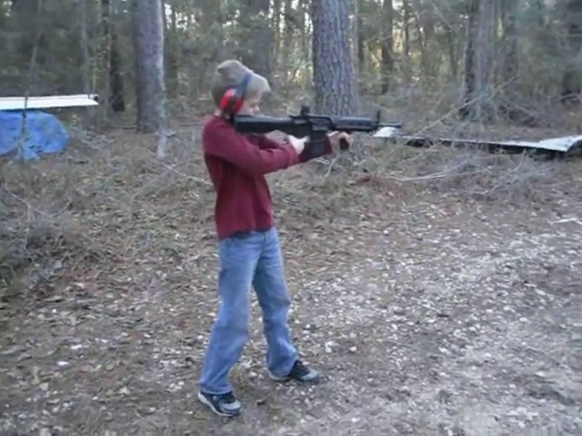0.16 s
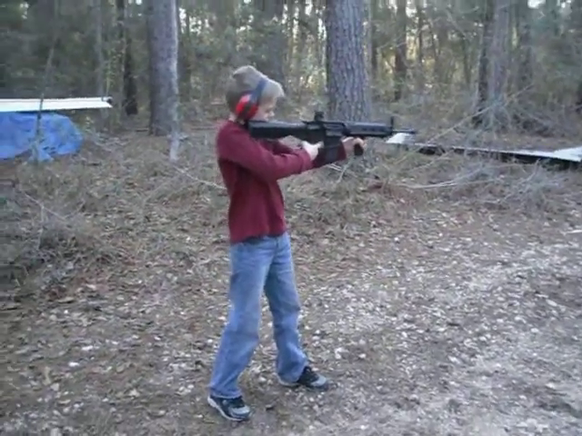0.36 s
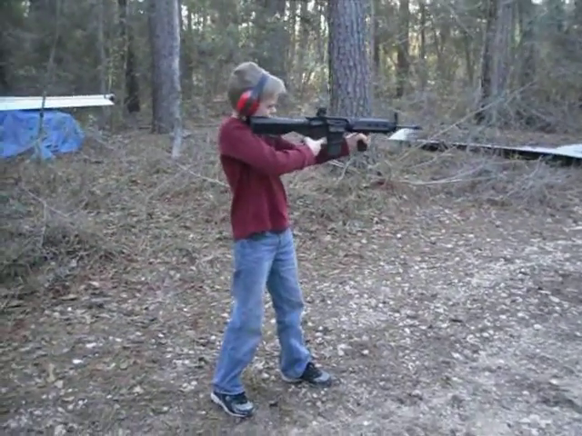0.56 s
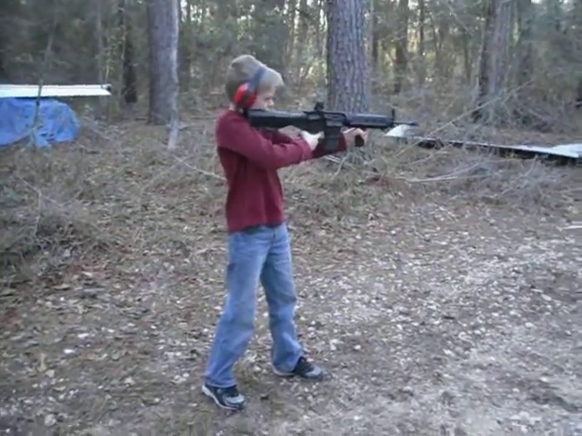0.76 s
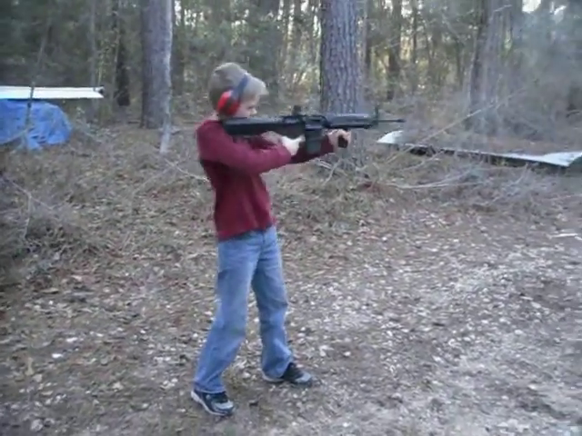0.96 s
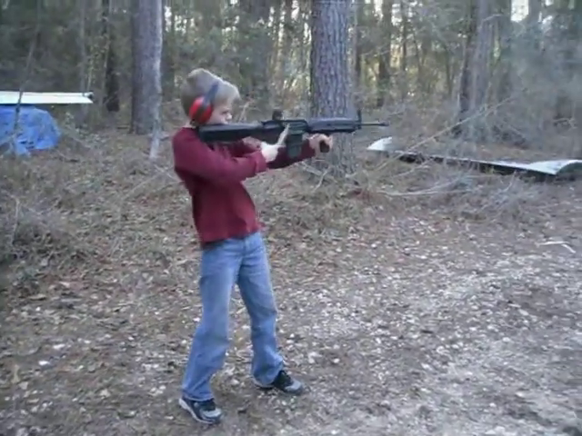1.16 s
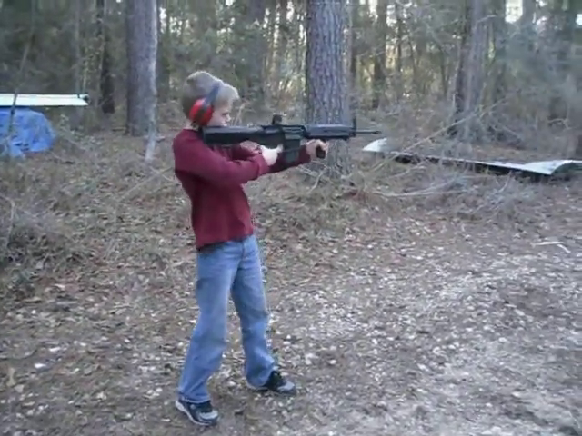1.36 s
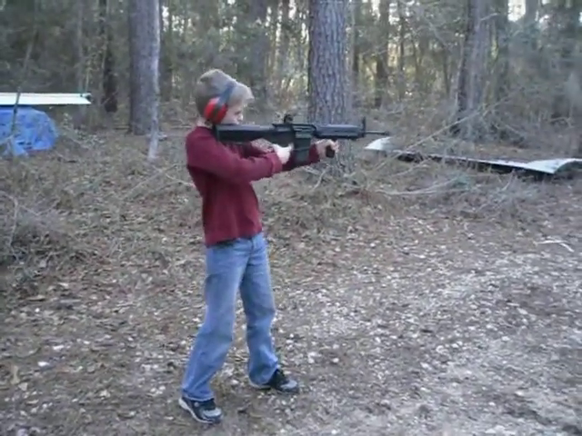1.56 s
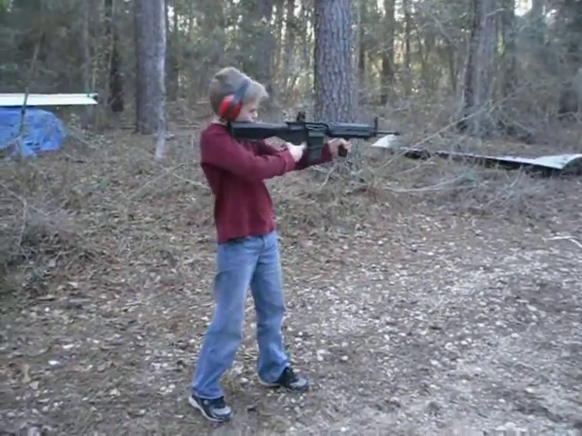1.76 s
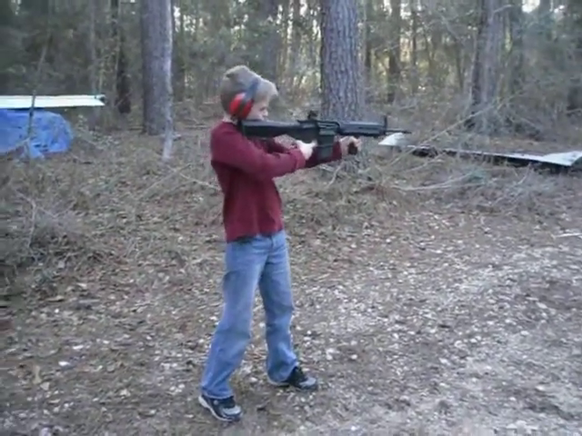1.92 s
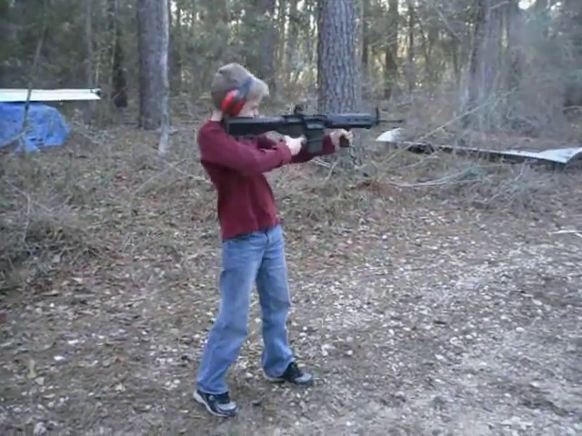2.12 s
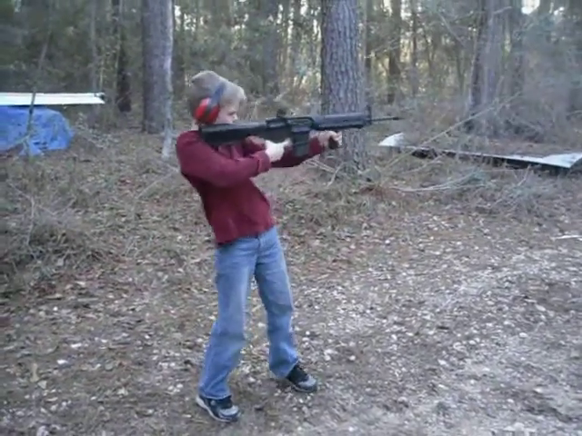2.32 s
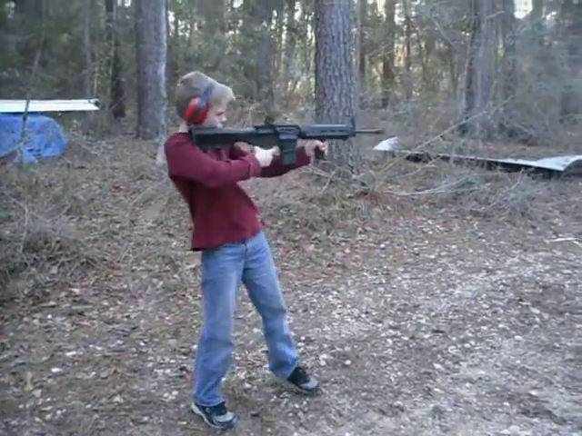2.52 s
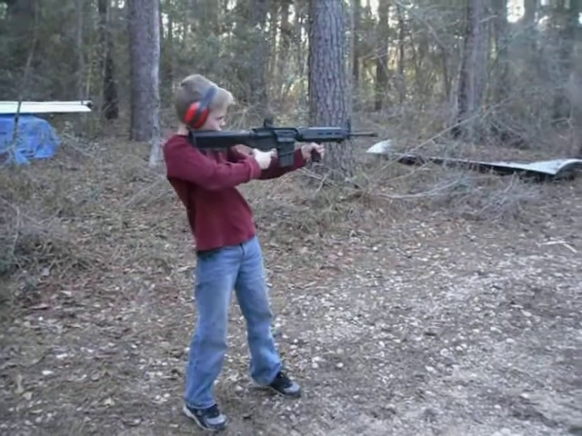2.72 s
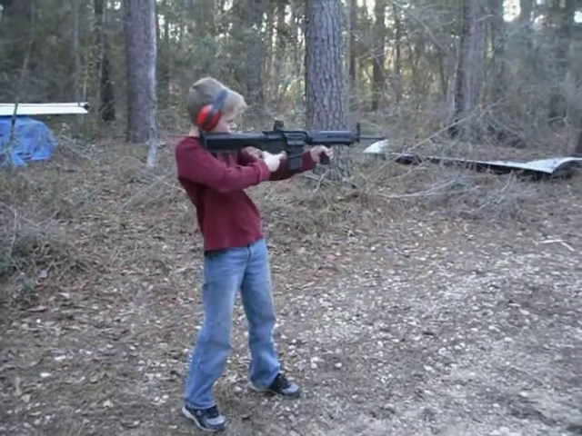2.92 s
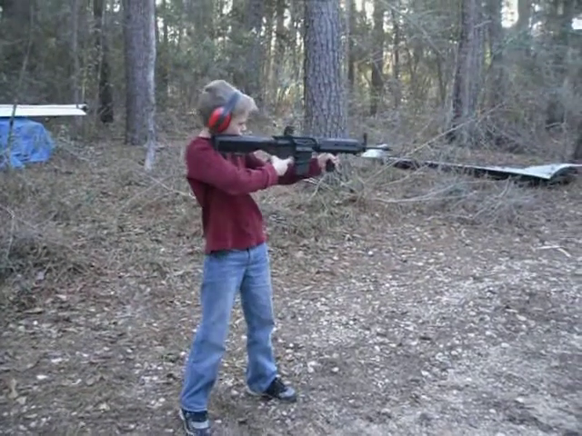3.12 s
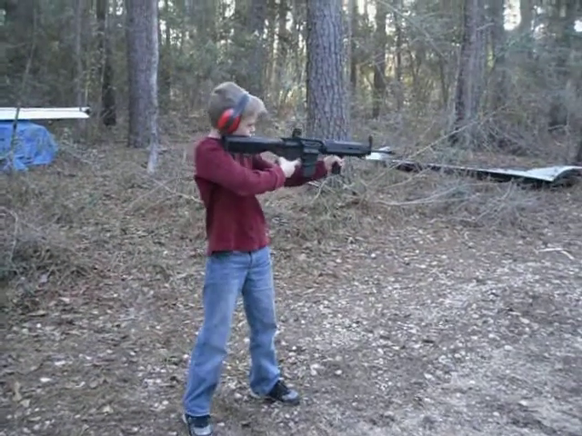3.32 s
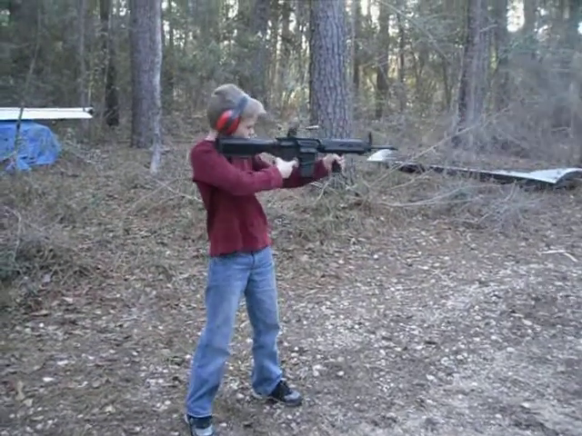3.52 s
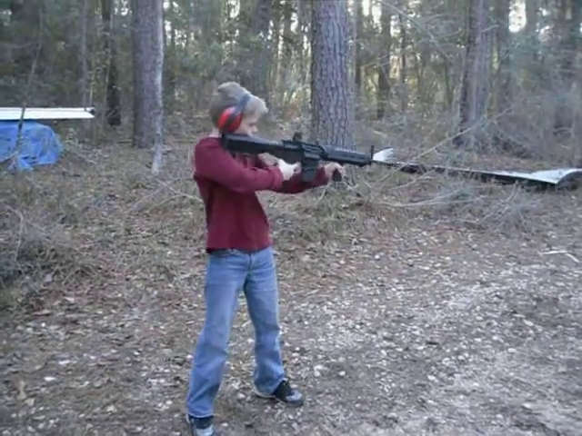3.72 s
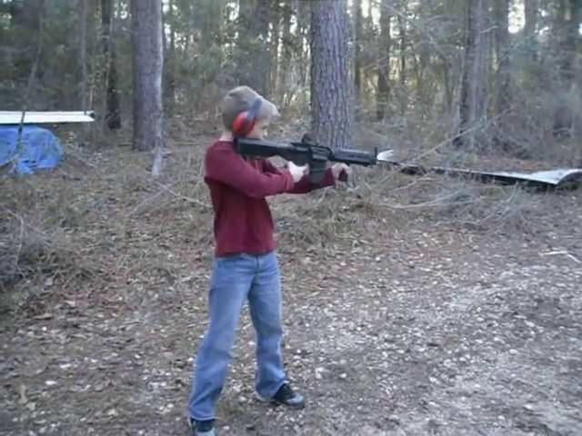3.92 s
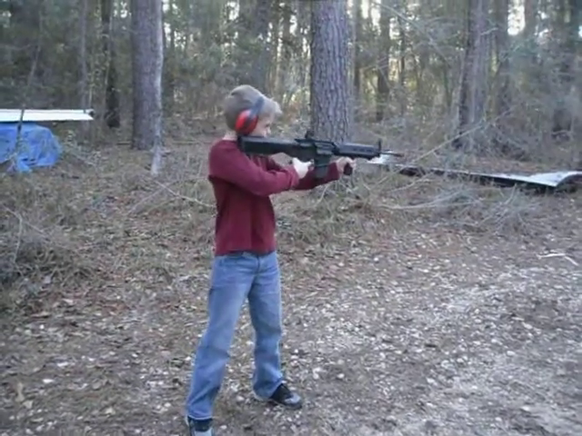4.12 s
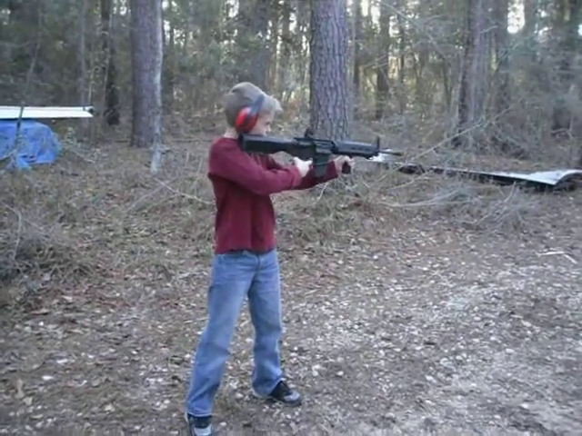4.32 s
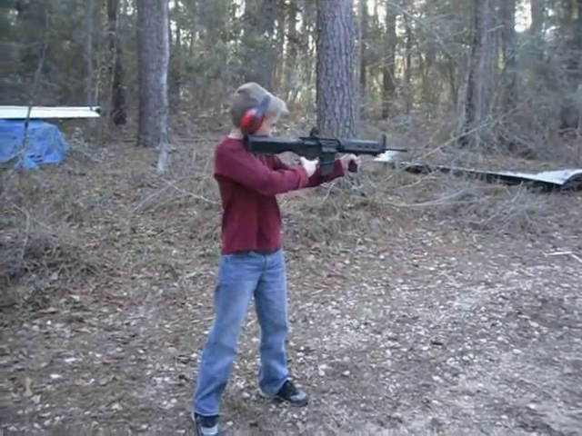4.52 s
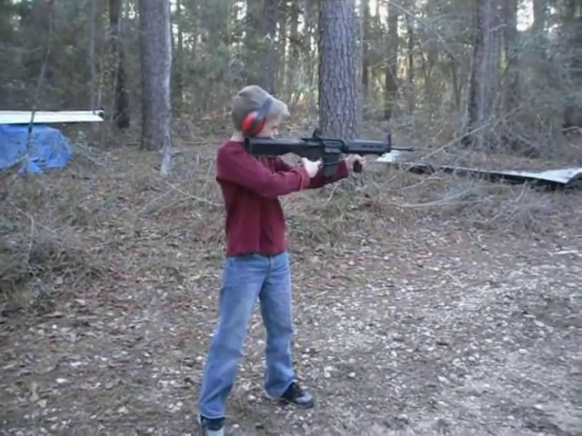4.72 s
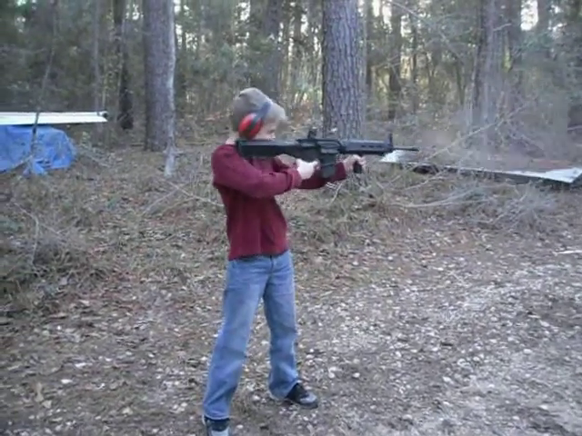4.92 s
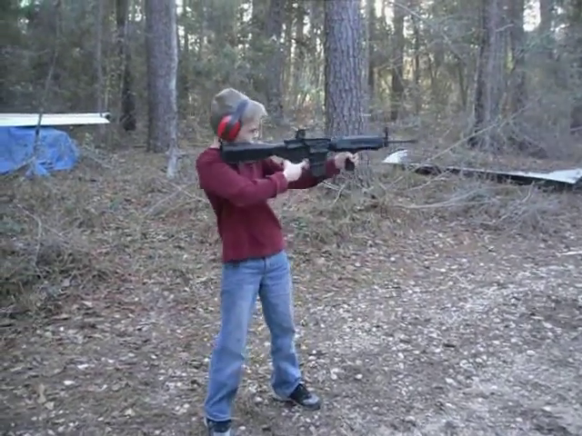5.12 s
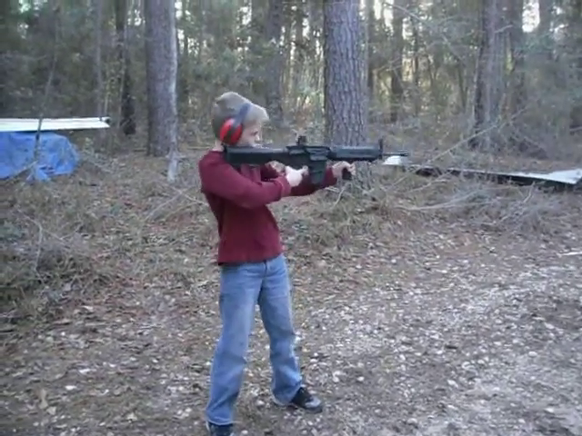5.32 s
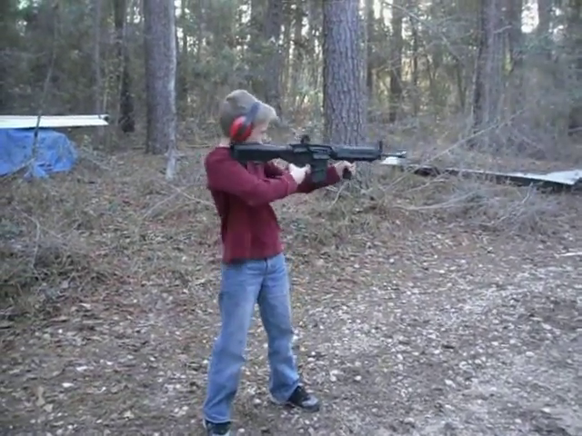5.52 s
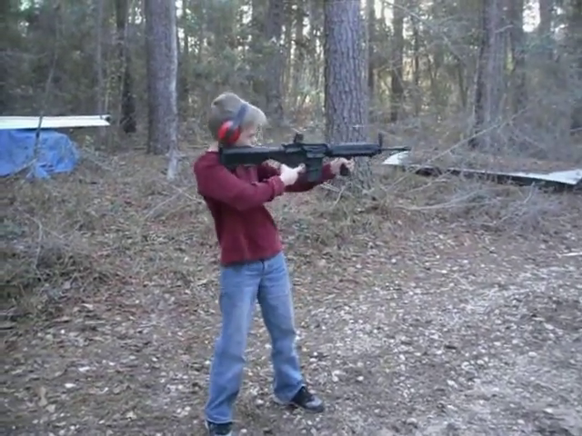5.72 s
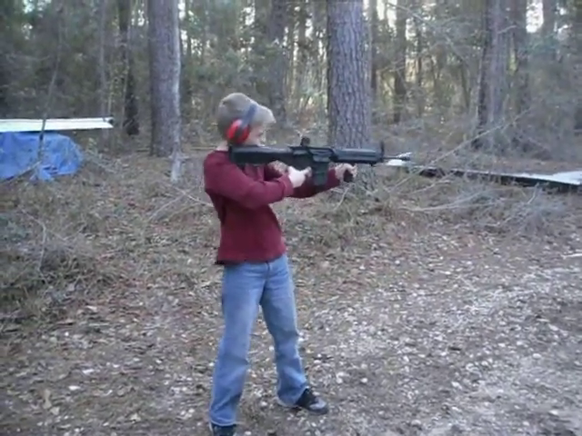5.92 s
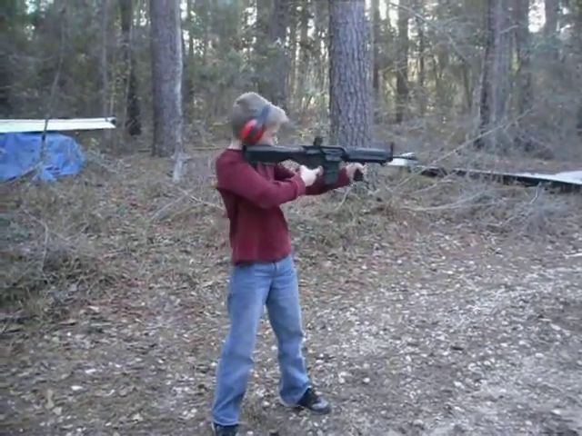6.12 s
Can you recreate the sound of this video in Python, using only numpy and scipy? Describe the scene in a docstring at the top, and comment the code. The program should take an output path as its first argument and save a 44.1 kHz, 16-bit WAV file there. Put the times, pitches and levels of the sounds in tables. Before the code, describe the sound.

A rifle fires five quick bursts in a forest clearing, a few metres from the microphone. Two shots come at 0.8 seconds, three at 2.0, then pairs at 3.4, 4.8 and 5.5, the rounds within each burst less than a tenth of a second apart. Each is a sharp crack with a low thump and a bolt clack buried in it, overloading the microphone into a gritty roar. The blasts slap off nearby trunks and roll through the woods for two to three seconds, filling the gaps. At about 2.3 seconds a bright metallic double ping rings down range. Spent brass cases land in dry leaves with small ticks and clinks, clearest at 1.4, 4.2 and 6.2 seconds, with a slight leaf rustle around 4.5. A very faint outdoor hush lies underneath, and the last echo is still fading at the end.

```python
"""In a pine clearing, a rifle fires five quick bursts of two or three rounds a few metres from a camera.
Each blast scatters off the ground and trunks, then reverberates through the woods; the bolt clacks,
something pings down range and spent brass cases land in dry leaves over a faint hush.
The blasts overdrive the camera's microphone, and clipping turns them into a square-topped roar."""
import sys
import numpy as np
from scipy import signal
from scipy.fft import rfft, irfft, next_fast_len
from scipy.io import wavfile
from scipy.ndimage import uniform_filter1d

SR = 44100
rng = np.random.default_rng(int(sys.argv[2]) if len(sys.argv) > 2 else 0)


def store_wav(level_fs):
    """Save 16-bit WAV to argv[1]."""
    pcm = np.round(np.clip(np.atleast_2d(level_fs), -1, 1) * 32767)
    wavfile.write(sys.argv[1], SR, pcm.T.astype(np.int16))


N = 276507

# bursts of fire: start t/s, rounds, cycle of the action t/s, relative level/dB, step per round/dB
BURST_TIMES = [(0.7893, 2, 0.092, -1, 0), (1.9669, 3, 0.089, -1.5, 1.32), (3.3503, 2, 0.089, 0.5, -2.5),
               (4.7931, 2, .0891, 0.9, -2.5), (5.473, 2, 0.085, 0, -1)]


def amp(db):
    """Amplitude ratio of a level in decibels."""
    return 10 ** (np.asarray(db) / 20)


def unit(x):
    """Normalisation to rms 1."""
    return x / np.sqrt(np.mean(x ** 2) + 1e-20)


def along(table, hz, column=1):
    """Interpolation of a table column on a logarithmic frequency axis."""
    columns = np.transpose(table)
    return np.interp(np.log(hz + 1), np.log(columns[0]), columns[column])


def filtered(x, response):
    """Linear filtering: the spectrum is multiplied by a frequency response."""
    n = x.shape[-1]
    padded = next_fast_len(n + 4096, real=True)
    return irfft(rfft(x, padded) * response(np.fft.rfftfreq(padded, 1 / SR)), padded)[..., :n]


def coloured(x, spectrum, peaks=()):
    """Spectral shaping by an envelope and Gaussian peaks; the result has rms 1, so levels are relative."""
    bumps = lambda f: sum(db * np.exp(-.5 * ((f - hz) / width) ** 2) for hz, width, db in peaks)
    return unit(filtered(x, lambda f: amp(along(spectrum, f) + bumps(f))))


def noise_band(size, hz, width_hz):
    """Resonance: noise under a Lorentzian peak, at rms 1."""
    return unit(filtered(rng.standard_normal(size), lambda f: 1 / (1 + ((f - hz) / width_hz) ** 2)))


def add(track, s, sound):
    """Superposition of a sound on the track from time s."""
    part = track[round(s * SR):][:len(sound)]
    part += sound[:len(part)]


def shots():
    """Periodic cycling of the action spaces the rounds of a burst: t/s, level/dB of each."""
    return [(start + k * cycle, db + k * step_db)
            for start, count, cycle, db, step_db in BURST_TIMES for k in range(round(count))]


def scatter(size, correlation=.7):
    """Scattering by fixed trees is correlated: one mostly alike noise row per round, and a time axis."""
    noise = rng.standard_normal((len(shots()) + 1, size))
    return np.sqrt(correlation) * noise[0] + np.sqrt(1 - correlation) * noise[1:], np.arange(size) / SR


def reverberation(table, rise_s, size, peaks=()):
    """Diffuse reflections build up, then decay exponentially at each frequency's own rate."""
    noise, t = scatter(size)
    hz, age, bands = signal.stft(coloured(noise, table, peaks).astype(np.float32), SR, nperseg=512)
    decay = amp(-60 * age / along(table, hz, column=2)[:, None]).astype(np.float32)
    tail = signal.istft(bands * decay, SR, nperseg=512)[1][:, :size]
    return tail * (1 - np.exp(-t / rise_s))


def air():
    """Stationary noise: a faint hush with a narrow band in it, heard as a thin distant drone."""
    # quiet woods and microphone hiss: f/Hz, level/dB
    hush_spectrum = [(18, -37), (30, -11), (76, -1), (104, -8), (458, -8), (648, -7.5), (711, -2.5),
                     (779, -8), (1180, -12.5), (3840, -17), (4110, -17), (5950, -18), (7500, -13.5),
                     (9750, -56), (16500, -120)]
    # the drone: f/Hz, width/Hz, gain/dB
    drone_peak = [(735, 11, 5)]
    return amp(-63) * coloured(rng.standard_normal(N), hush_spectrum, peaks=drone_peak)


def leaf_litter(crinkle_db=4, sift_db=-74):
    """Amplitude-modulated noise: dry leaves crinkle in swells, and sift faintly from the first shot on."""
    # stirrings of the litter: t/s, level/dB, swell t/s
    stirrings = [(4.32, -63, .015), (4.521, -64, .025), (4.58, -69.5, .015)]
    # rustle of dry leaves: f/Hz, level/dB
    leaf_spectrum = [(2500, -11.5), (4500, -6), (6500, 10), (7500, -8.5)]
    track, t = np.zeros(N), np.arange(SR // 4) / SR
    for s, db, swell in stirrings:
        noise = rng.standard_normal(len(t))
        crinkle = amp(crinkle_db * unit(uniform_filter1d(rng.standard_normal(len(t)), size=100)))
        envelope = amp(db) * t / swell * np.exp(1 - t / swell)
        add(track, s, envelope * coloured(noise * crinkle, leaf_spectrum))
    add(track, BURST_TIMES[0][0], amp(sift_db) * coloured(rng.standard_normal(N), leaf_spectrum))
    return track


def spent_cases(tick_t60=.031, rustle_db=-20, rustle_t60=.18):
    """Impact excites a case's modes, more so in a hard landing; each end ticks and stirs the leaves."""
    # cases landing: t/s, level/dB, tick f/Hz
    landings = [(1.4356, -39, 6100), (1.8781, -55, 6470), (2.846, -54, 6200), (3.013, -50, 6400),
                (4.152, -47.5, 5166), (4.2335, -32, 4380), (4.3218, -50, 6210), (4.5314, -55, 4800),
                (6.1624, -39, 6800), (6.2302, -48, 5810), (6.2507, -47, 6190), (6.2644, -42, 5890)]
    # modes of a brass case: f/Hz, level/dB, T60/s
    brass_modes = [(3025, 0, .067), (3402, -7, .063), (3760, 2, 0.05), (5087, -14, .072), (7200, -2, .032)]
    slap_s, slap_db = .0052, -8.5  # the second end comes down
    ring_db, ring_slope = -6, .7  # ring relative to tick at the hardest landing; dB lost per dB softer
    track, t = np.zeros(N), np.arange(SR // 5) / SR
    hardest_db = max(db for s, db, hz in landings)
    ring = sum(amp(db - 60 * t / t60) * np.sin(2 * np.pi * hz * t) for hz, db, t60 in brass_modes)
    decay = amp(-60 * t / tick_t60) + amp(rustle_db - 60 * t / rustle_t60)
    for s, db, hz in landings:
        add(track, s, amp(db + ring_db + ring_slope * (db - hardest_db)) * ring)
        for delay, drop_db in ((0, 0), (slap_s, slap_db)):
            add(track, s + delay, amp(db + drop_db) * noise_band(len(t), hz, width_hz=2000) * decay)
    return track


def pings(rise_s=.0036, t60=.063, echo_db=-20.5):
    """Damped resonance, perhaps of metal grazed by a bullet, prolonged by reverberation in the trees."""
    # pings down range: t/s, level/dB
    ping_times = [(2.254, -2), (2.289, -10)]
    # the woods' response to a ping: f/Hz, level/dB, T60/s
    ping_tail = [(1505, -25, 1.8), (2900, 0.5, 1.53), (4180, -14.5, 1.13), (7500, -23, 1.3)]
    track, t = np.zeros(N), np.arange(SR // 4) / SR
    tails = reverberation(ping_tail, rise_s=.06, size=3 * SR // 2)
    for (s, db), tail in zip(ping_times, tails):
        ring = noise_band(len(t), hz=3070, width_hz=230)
        add(track, s, ring * (1 - np.exp(-t / rise_s)) * amp(db - 60 * t / t60))
        add(track, s, amp(db + echo_db) * tail)
    return track


def muzzle_thump(level_db=14.5, hz=140, t60=.043):
    """Expanding muzzle gas pushes the air into a low, heavily damped oscillation."""
    track, t = np.zeros(N), np.arange(SR // 8) / SR
    for s, db in shots():
        add(track, s, amp(db + level_db - 60 * t / t60) * np.sin(2 * np.pi * hz * t))
    return track


def report(spectrum, rise_s, t60):
    """A broadband transient for each round: steep onset, exponential decay."""
    noise, t = scatter(SR // 8)
    return coloured(noise, spectrum) * (1 - np.exp(-t / rise_s)) ** 2 * amp(-60 * t / t60)


def rifle(build_up_s=.08, bolt_delay_s=.063):
    """Multipath propagation: each crack arrives direct, scattered and echoed; the bolt slams home."""
    # muzzle crack: f/Hz, level/dB
    crack_spectrum = [(100, -7.5), (600, -6), (1500, -2), (3000, 9.5), (5000, 0), (7500, 4.5)]
    # scatter from the ground and nearest trunks: f/Hz, level/dB, T60/s
    clearing = [(30, -26.5, 0.15), (89.9, -10, 0.2), (170, -4.5, 0.19), (322, -2, 0.26), (490, 0.5, 0.22),
                (898, 0.5, 0.25), (1027, -10, 0.3), (1940, -10, 0.2), (3260, -14, 0.2), (4500, -23.5, 0.28),
                (7500, -21.5, 0.3)]
    # pitches reinforced by nearby reflections: f/Hz, width/Hz, gain/dB
    reinforced = [(116, 9, 7), (165.2, 19, 8.5), (255, 6.7, 8), (344.3, 10, 1.5), (441, 8.8, 11),
                  (529.5, 10, 6.5), (625, 20, 3), (1633, 28, 8.5)]
    # reverberation of the surrounding trees: f/Hz, level/dB, T60/s
    near_trees = [(30, -15, 0.37), (151, -9.5, .7), (350, -6.5, 0.9), (623, 5.5, 0.8), (1200, -7, 1),
                  (2200, -9, 0.76), (3100, -9.5, 0.83), (4200, -16.5, 0.64), (7800, -21, 0.65)]
    # long roll from the far woods: f/Hz, level/dB, T60/s
    far_woods = [(30, -37, 2.4), (96, -13.5, 1.8), (160, -24.5, 3), (330, -8, 2.52), (480, -6.5, 2.9),
                 (725, -4, 3.39), (842, -4, 2.65), (1115, -14.5, 2.9), (1986, -15, 2.03),
                 (3210, -24.5, 1.79), (4500, -29, 1.17), (7500, -42, 1.3)]
    # distinct echoes from big trunks: delay t/s, level/dB
    trunk_echoes = [(.033, 11), (.046, 5.5), (.13, -1), (.19, -9)]
    arrivals = [(0, amp(29) * report(crack_spectrum, rise_s=.0012, t60=.025)),
                (0, amp(17.5) * reverberation(clearing, rise_s=.0021, size=SR // 2, peaks=reinforced)),
                (0, amp(.5) * reverberation(near_trees, rise_s=build_up_s, size=3 * SR // 2)),
                (0, amp(-14.5) * reverberation(far_woods, rise_s=build_up_s, size=5 * SR // 2)),
                (bolt_delay_s, amp(8) * report(crack_spectrum, rise_s=.00089, t60=.016))]
    arrivals += [(delay, amp(db) * report(clearing, rise_s=.00091, t60=.06)) for delay, db in trunk_echoes]
    track = np.zeros(N)
    for delay, rounds in arrivals:
        for (s, db), sound in zip(shots(), rounds):
            add(track, s + delay, amp(db) * sound)
    return track


def scene():
    """Superposition of all sources at the single microphone."""
    return (rifle() + muzzle_thump() + pings() + spent_cases() + leaf_litter() + air())[None]


def clipped_at(x, new_rate, old_rate, ceiling=.7):
    """Resampling followed by hard clipping."""
    resampled = signal.resample_poly(x, new_rate, old_rate, axis=-1, window=("kaiser", 6))
    return np.clip(resampled, -ceiling, ceiling)


def record(dry, camera_rate=16000, band_hz=7800, top_hz=16100):
    """Aliasing: the camera clips at a low sample rate, so the overtones fold back as grit."""
    narrow = filtered(dry, lambda hz: 1 / np.sqrt(1 + (hz / band_hz) ** 70))
    samples = clipped_at(narrow, camera_rate, SR)
    wave = clipped_at(samples, SR, camera_rate)[:, :N]  # the overshoot between samples clips again
    return filtered(wave, lambda hz: np.sin(np.pi / 2 * np.clip((top_hz - hz) / 400, 0, 1)) ** 2)


dry = scene()
out = record(dry)
store_wav(out)
```